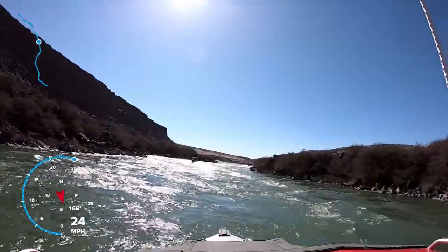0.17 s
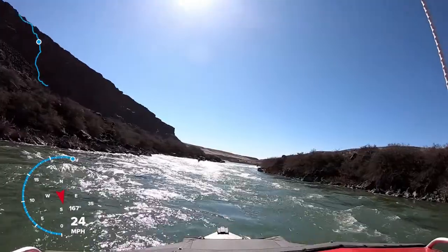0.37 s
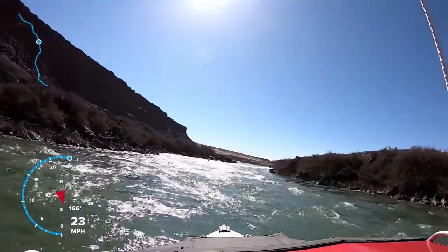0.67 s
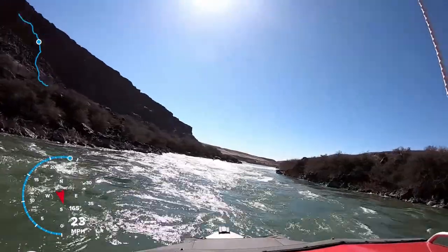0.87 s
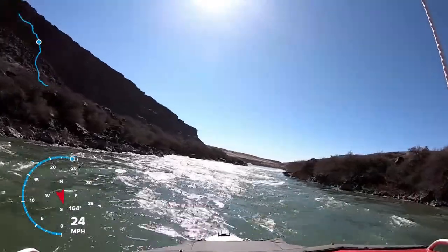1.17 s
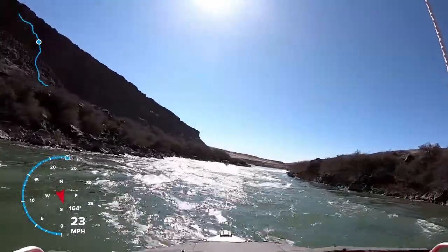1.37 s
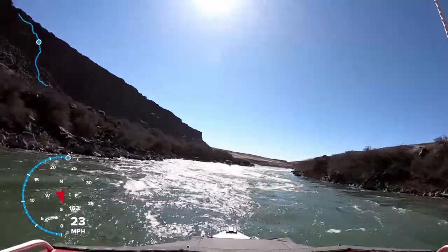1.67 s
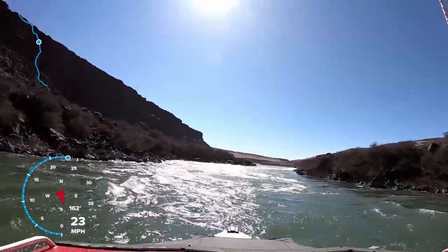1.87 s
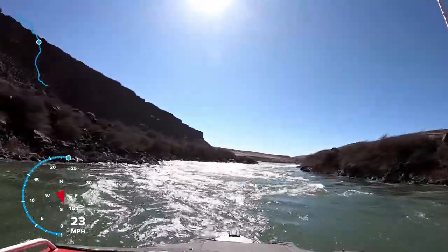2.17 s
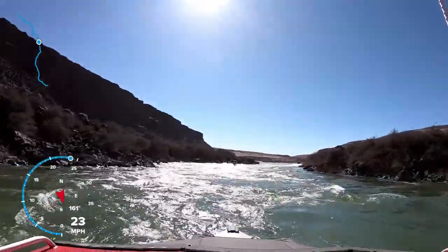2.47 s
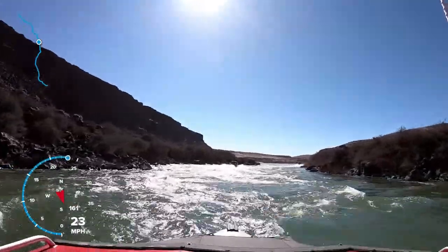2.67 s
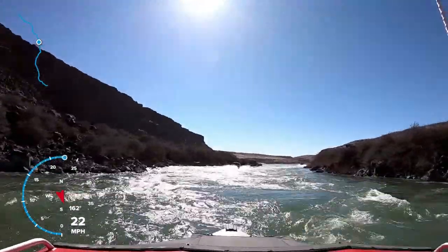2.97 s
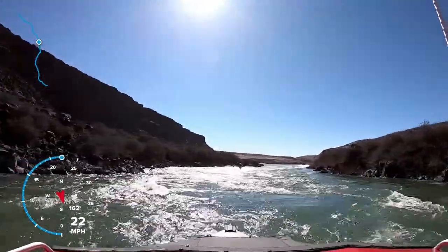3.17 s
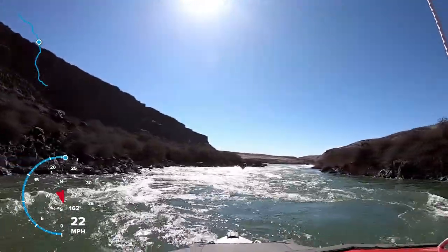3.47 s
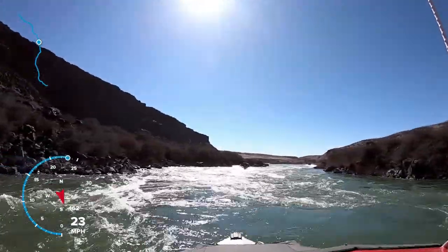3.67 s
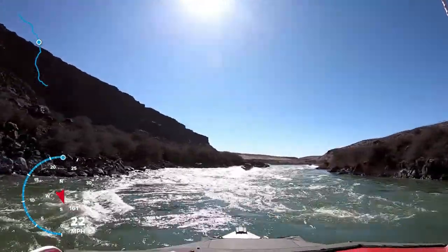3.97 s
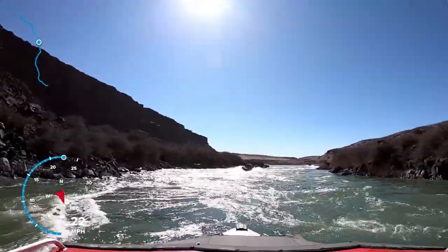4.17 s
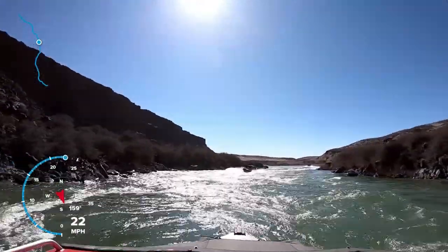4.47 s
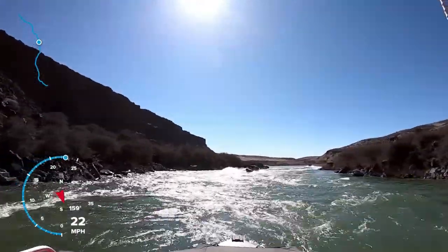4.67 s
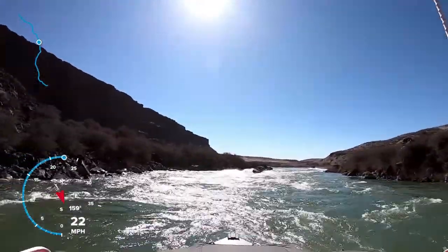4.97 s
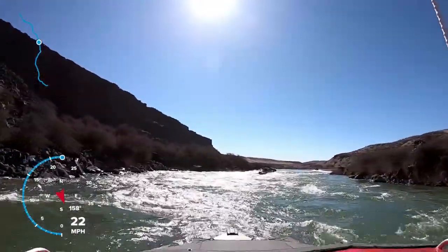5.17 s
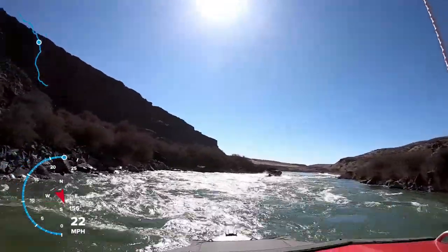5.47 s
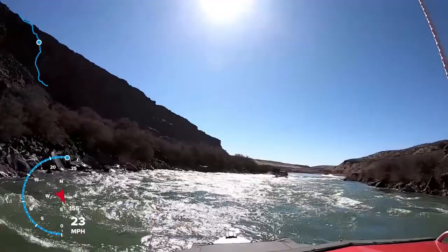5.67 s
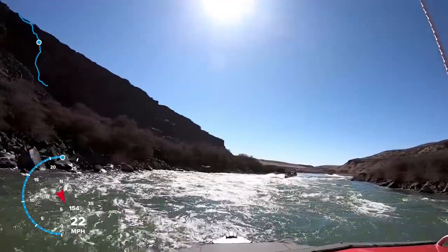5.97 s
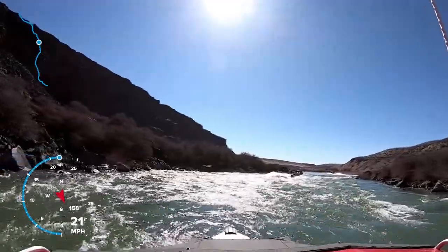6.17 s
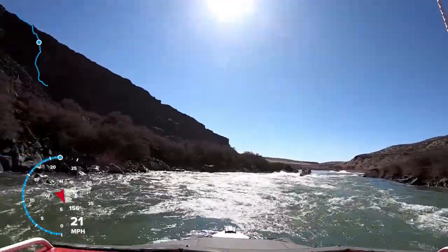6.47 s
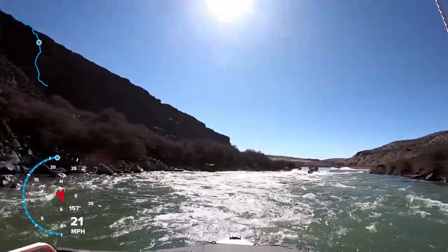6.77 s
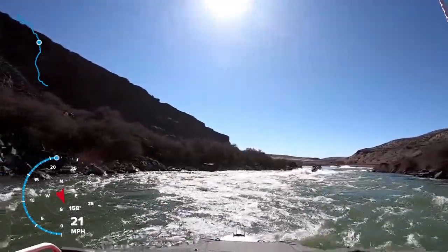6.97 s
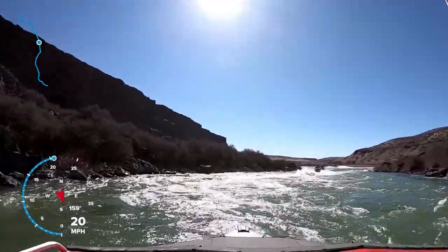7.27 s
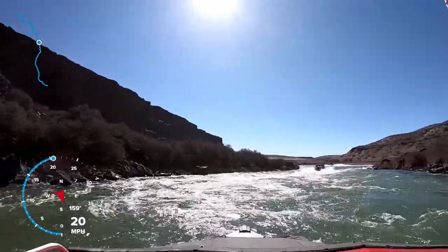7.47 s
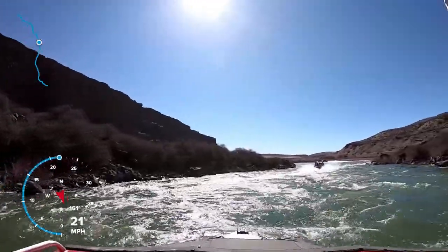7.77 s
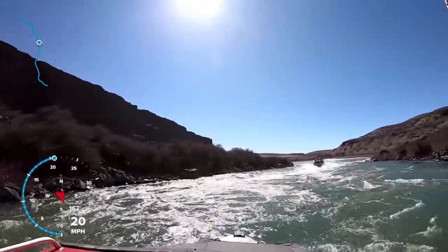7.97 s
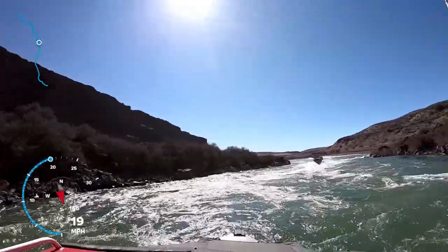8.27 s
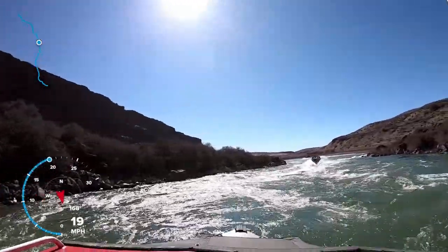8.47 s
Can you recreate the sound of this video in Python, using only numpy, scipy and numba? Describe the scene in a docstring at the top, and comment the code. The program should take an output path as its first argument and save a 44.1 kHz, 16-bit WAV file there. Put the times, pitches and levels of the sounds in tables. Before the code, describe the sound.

Wind rumbles, slaps and cracks against a deck microphone while a boat engine's smooth drone dips and rises over faint rushing river water.

```python
"""The firing tone of a jet boat's eight-cylinder engine slides and booms as the boat runs up a rapid.
Wind rumbles, slaps and cracks at the port of one deck microphone; white water and spray hiss behind.
Engine: sines at the firing rate and on its eighths, lifted by hull resonances. Wind and water: shaped
noise; cracks and jolts: short pressure pulses. A limiter holds the peaks; output is mono."""
import sys
import numpy as np
from scipy import signal
from scipy.fft import rfft, irfft, next_fast_len
from scipy.io import wavfile
from scipy.ndimage import uniform_filter1d
from numba import njit

SR = 44100
rng = np.random.default_rng(int(sys.argv[2]) if len(sys.argv) > 2 else 0)


def persist_wave(psi):
    """Save psi, clipped to +-1, as 16-bit WAV."""
    counts = np.round(np.clip(psi, -1, 1) * 32767).astype(np.int16)
    wavfile.write(sys.argv[1], SR, np.atleast_2d(counts).T)


N = 380141

# wind between the gusts: t/s, rumble level/dB, rasp level/dB
WIND_LEVELS = [(0, -26.5, -34.5), (.5, -27.5, -35.5), (1.1, -27.5, -34), (1.2, -33, -34), (1.42, -36, -35),
               (1.6, -33, -35), (1.8, -29, -37), (2.15, -29.5, -34.5), (2.45, -27.5, -35.5),
               (3.1, -28.5, -39), (3.6, -27, -39.5), (4.25, -26.5, -36), (4.6, -26, -35), (5.0, -26.5, -38),
               (5.3, -27, -37.5), (5.55, -32, -40), (6.2, -26.5, -35), (6.65, -26, -30.5),
               (6.95, -26, -36.5), (7.4, -28, -37.5), (7.56, -36, -38.5), (7.72, -45, -39.5),
               (7.95, -41, -41), (8.05, -35, -40.5), (8.2, -25.5, -40), (8.45, -31, -39), (8.62, -41, -35)]
# eddies at the port: t/s, nominal slap peak/dB, low gust rms/dB, edge against slap/dB
EDDIES = [(.04, -40, -32, -14), (.095, -27, -31, -4), (.185, -20.5, -23, -15), (0.231, -13, -19, -34),
          (.341, -12, -27, -36), (.734, -20, -23, -23), (.906, -18, -32, -18), (1.208, -25, -39, -25),
          (1.449, -39, -33, -12), (1.492, -20, -25.5, -13), (1.583, -25, -31, -18),
          (1.691, -16.5, -25, -35), (1.715, -13, -19.5, -29), (1.779, -16, -23, -29.5),
          (1.845, -19.5, -28, -17), (2.091, -27, -27, -24), (2.216, -13, -23, -15), (2.337, -33, -23, -21),
          (2.36, -14.5, -30, -16), (2.462, -36, -28, -26), (2.53, -32, -34, -25), (2.7, -22, -22, -20),
          (2.819, -20, -24.5, -22), (2.877, -20.5, -29, -16), (2.978, -15, -19, -16),
          (3.194, -11, -23, -19), (3.338, -20.5, -21, -11), (3.441, -11, -18.5, -20),
          (3.516, -19, -30, -13), (3.554, -12, -21, -24), (3.66, -42, -32, -18), (3.76, -16, -19.5, -12),
          (3.79, -18.5, -20.5, -23), (3.829, -19, -25, -32), (3.931, -23, -23.5, -18),
          (4.052, -17, -26, -26), (4.138, -23, -29, -29), (4.198, -18, -24, -25),
          (4.353, -15.5, -22.5, -17), (4.449, -11.5, -22.5, -20), (4.507, -14, -23, -17),
          (4.606, -11.5, -28, -31), (4.66, -34, -19.5, -23), (4.729, -15.5, -26, -28),
          (4.752, -16, -23, -24), (4.815, -24, -28, -14), (4.835, -11.5, -19, -14), (4.861, -25, -42, -33),
          (4.921, -17.5, -23.5, -36), (5.039, -14.5, -22, -16), (5.065, -19.5, -28, -28),
          (5.29, -25, -26, -16), (5.315, -22, -22.5, -16), (5.349, -26, -28, -28), (5.372, -15, -30, -19),
          (5.391, -18, -29, -18), (5.414, -20.5, -22, -31), (5.632, -36, -23.5, -11),
          (5.682, -16.5, -25, -15), (5.779, -19, -25.5, -25), (5.883, -14.5, -23.5, -17),
          (5.934, -20, -22, -12), (5.966, -22, -36, -18), (6.195, -14.5, -24, -22), (6.467, -24, -31, -20),
          (6.615, -34, -29, -20), (6.652, -33, -29, -29), (6.7, -18, -23.5, -24), (6.78, -31, -22, -22),
          (6.95, -24, -23, -10), (6.972, -14, -22, -23), (7.069, -26, -26.5, -19), (7.203, -23, -23, -21),
          (8.047, -37, -24.5, 3), (8.117, -19, -27, -12), (8.565, -25, -31.5, -22), (8.59, -21, -20.5, -25)]
SLAP_S = 0.011  # mean half length


def undb(db):
    """Decibels to gain."""
    return 10 ** (np.asarray(db) / 20)


def curves(table):
    """Columns after time, interpolated to one value per sample."""
    t_s, *columns = np.transpose(table)
    return [np.interp(np.arange(N) / SR, t_s, c) for c in columns]


def walk(rate_hz):
    """Random levels held 1 / rate_hz and slewed by two moving averages; standard deviation 1."""
    hold = int(SR / rate_hz)
    steps = np.repeat(rng.standard_normal(N // hold + 1), hold)
    slewed = uniform_filter1d(uniform_filter1d(steps, hold), hold)[:N]
    return slewed / slewed.std()


def noise(points, shared_db, own_db, rate_hz):
    """Coloured noise, rms 1, in overlapping 2/3-octave bands; levels flicker together and alone."""
    size = next_fast_len(N)
    bin_place = np.log2(np.arange(size // 2 + 1) * SR / size + 1e-9) * 3 / 2  # in 2/3 octaves
    f_hz, level_db = np.transpose(points)
    place = np.log2(f_hz) * 3 / 2
    colour = undb(np.interp(bin_place, place, level_db, -200, -200))
    spectrum = rfft(rng.standard_normal(size)) * colour
    out, shared = 0, shared_db * walk(rate_hz)
    for centre in range(int(place[0]), int(place[-1]) + 2):
        window = np.clip(1 - abs(bin_place - centre), 0, 1)
        out = out + irfft(spectrum * window, size)[:N] * undb(shared + own_db * walk(rate_hz))
    return out / out.std()


def band(lo_hz, hi_hz, order=2):
    """Noise of rms 1 between two edges."""
    sos = signal.butter(order, [lo_hz, hi_hz], "band", fs=SR, output="sos")
    x = signal.sosfilt(sos, rng.standard_normal(N))
    return x / x.std()


def puffs(times_s, peaks, lengths_s):
    """Sum of Gaussian swells."""
    out = np.zeros(N)
    for t_s, peak, length_s in zip(times_s, peaks, lengths_s):
        first = max(int((t_s - 3 * length_s) * SR), 0)
        last = min(int((t_s + 3 * length_s) * SR), N)
        i = np.arange(first, last)
        out[i] += peak * np.exp(-((i / SR - t_s) / length_s) ** 2)
    return out


def steady(x, span_s):
    """Evens out the level over this span and keeps the finer grain."""
    return x / np.sqrt(uniform_filter1d(x ** 2, int(span_s * SR)) + 1e-3)


def river():
    """White water round the hull, fine spray above it and ticking drops: noise in three colours."""
    # t/s, white water level/dB, spray level/dB
    river_levels = [(0.0, -49, -63), (0.02, -48, -61.5), (0.12, -46.5, -61), (0.89, -48, -62),
                    (1.06, -49, -66.5), (1.4, -49.5, -62.5), (1.9, -48.5, -61.5), (2.88, -46.5, -58),
                    (3.07, -48.5, -59.5), (3.53, -49, -60), (3.6, -50, -64.5), (4.34, -47, -58),
                    (4.49, -47, -60), (5.54, -49.5, -61.5), (6.74, -47, -60), (7.46, -49.5, -58.5),
                    (7.7, -50, -61), (7.92, -51, -63), (8.2, -49, -62.5), (8.62, -45.5, -59.5)]
    # noise spectra: f/Hz, relative density level/dB
    water_spectrum = [(350, -33), (600, -9), (785, -15.5), (868, -7), (1180, -7.5), (1370, -4), (1610, -9),
                      (3540, -12.5), (6500, -30), (8450, -57), (14300, -120)]
    spray_spectrum = [(3500, -19.5), (4500, -5), (5200, -4.5), (6350, -8.5), (8150, -8.5), (9600, -14.5),
                      (10300, -21.5), (11000, -29), (12500, -32), (15500, -40.5), (17000, -52.5)]
    # drops on the housing: t/s, envelope peak/dB
    drops = [(8.176, -63)]

    water_db, spray_db = curves(river_levels)
    water = noise(water_spectrum, shared_db=-0.64, own_db=0.0, rate_hz=12)
    spray = noise(spray_spectrum, shared_db=-0.5, own_db=1.24, rate_hz=13)
    t_s, drop_db = np.transpose(drops)
    ticks = puffs(t_s + .002, undb(drop_db), .002 + 0 * t_s) * band(3000, 9000, order=6)
    return undb(water_db) * water + undb(spray_db) * spray + ticks


def wind():
    """Turbulence on the port: a deep rumble and a rasp that swell with every gust."""
    # noise spectra: f/Hz, relative density level/dB
    rumble_spectrum = [(15, -32.5), (25, 0), (40, 0), (65, 4), (90, -2.5), (130, 0.5), (180, -4.5),
                       (250, -18.5), (400, -31)]
    rasp_spectrum = [(100, -21), (170, -3.5), (260, 0.5), (400, -4.5), (630, -10), (1000, -17), (1600, -26),
                     (3000, -37)]
    # brief changes of the wind between gusts: t/s, change/dB
    brief_changes = [(.47, -1), (.83, -6), (1.37, -0.5), (1.83, -5), (2.4, -8), (2.44, -6), (2.6, 0),
                     (2.92, 0), (3.28, 6), (3.62, -1.5), (3.99, -3), (4.25, -3), (5.12, -4.5), (5.48, 1),
                     (6.0, -3.5), (6.25, -6), (6.82, -0.5), (7.02, -4.5)]
    change_s = .028  # half length
    gust_s, gust_late_s = 0.026, 0.0057  # half length; delay of gust peak after the tabled time
    gust_rasp_db = -21.5  # rasp rms against nominal slap peak

    rumble_db, rasp_db = curves(WIND_LEVELS)
    t_s, slap_db, gust_db, _ = np.transpose(EDDIES)
    gust_t_s, gust_lengths_s = t_s + gust_late_s, gust_s + 0 * t_s
    low_gust = puffs(gust_t_s, undb(gust_db), gust_lengths_s)
    high_gust = puffs(gust_t_s, undb(slap_db + gust_rasp_db), gust_lengths_s)
    rumble = steady(noise(rumble_spectrum, shared_db=1.1, own_db=1.5, rate_hz=14), .09)
    rasp = noise(rasp_spectrum, shared_db=1.0, own_db=1.5, rate_hz=35)
    t_s, depth_db = np.transpose(brief_changes)
    change_db = puffs(t_s, depth_db, change_s + 0 * t_s)
    rumble_gain = np.hypot(undb(rumble_db + change_db), low_gust)
    rasp_gain = np.hypot(undb(rasp_db + change_db), high_gust)
    return rumble_gain * rumble + rasp_gain * rasp


def slaps():
    """Each eddy is a ragged swell of noise with a tail, over a longer bass thump without one."""
    crest_db = 16.5  # peak of a short noise burst over its rms
    thump_db = -4.5  # against the low gust
    length_spread = .12  # log standard deviation
    ragged_db, ragged_hz = 3, 200
    tail_lengths, tail_db = 2.6, -10.5  # tail length in slaps; level against the slap
    splash_db = -12  # upper mids against the body

    t_s, slap_db, gust_db, edge_db = np.transpose(EDDIES)
    chance = rng.standard_normal((len(t_s), 2)).T
    length_s = SLAP_S * np.exp(length_spread * chance[0])
    t_s, slap_db = t_s + 0.54 * SLAP_S, slap_db - crest_db
    tail_s = tail_lengths * length_s

    def swell(db, share, hiss):
        grains = steady(hiss * undb(ragged_db * walk(ragged_hz)), .02)
        hit = puffs(t_s, undb(db), share * length_s)
        tail = puffs(t_s + tail_s / 2, undb(db + tail_db + 2 * chance[1]), tail_s)
        return (hit + tail) * grains

    body = swell(slap_db, 1., band(280, 547))
    thump = puffs(t_s, undb(gust_db + thump_db), 1.59 * length_s) * steady(band(90, 285), 0.048)
    edge = swell(slap_db + edge_db, .8, band(730, 3100))
    splash = swell(slap_db + splash_db, 0.75, band(560, 1300))
    muffle = signal.butter(4, 4000, fs=SR, output="sos")
    return signal.sosfilt(muffle, body + thump + edge + splash)


def cracks():
    """Port pressure jumps either way within a fraction of a millisecond and swings back, damped."""
    # t/s, pulse peak/dB
    crack_peaks = [(.346, -26), (.739, -28), (1.032, -28), (1.713, -23), (1.777, -26), (2.09, -35),
                   (2.218, -24), (2.367, -24), (3.196, -20.5), (3.339, -27), (3.439, -22.5), (3.452, -23),
                   (3.761, -24), (3.787, -26), (3.807, -25), (4.053, -22.5), (4.197, -31), (4.449, -27),
                   (4.728, -26), (4.825, -23), (4.832, -20), (4.843, -14.5), (4.858, -26), (4.919, -24),
                   (5.041, -32), (5.348, -29), (5.371, -26), (5.688, -30), (5.694, -19), (5.883, -31),
                   (5.935, -23.5), (6.205, -23), (6.476, -26), (6.752, -26), (6.977, -26), (6.984, -16),
                   (7.195, -40), (8.117, -30)]
    t_s, peak_db = np.transpose(crack_peaks)
    blows = np.zeros(N)
    blows[((t_s + .0015) * SR).astype(int)] = undb(peak_db) * rng.choice([-1, 1], len(t_s))
    age_s = np.arange(SR // 20) / SR
    jump = np.exp(-age_s / 0.0009) * np.cos(2 * np.pi * 700 * age_s)
    jump = signal.sosfilt(signal.butter(3, 1900, fs=SR, output="sos"), jump)
    return signal.fftconvolve(blows, jump / abs(jump).max())[:N]


def jolts():
    """N-shaped swings: pressure winds up one way, snaps across and sags back, in either polarity."""
    # t/s, peak-to-peak snap/dB
    snaps = [(0.231, -12), (0.239, -6.5), (0.253, -10), (0.354, -17), (0.746, -12), (1.5, -15),
             (1.585, -15), (1.701, -10), (1.714, -24), (1.782, -4.5), (2.095, -9), (2.353, -12),
             (2.361, -9), (3.198, -10), (3.453, -12), (3.556, -11), (3.791, -16), (3.834, -18),
             (4.215, -13), (4.451, -15), (4.608, -14), (4.616, -7.5), (4.754, -8), (4.827, -9), (4.831, -9),
             (4.845, -17), (4.863, -14), (4.918, -13), (4.935, -13), (5.324, -18), (5.352, -11),
             (5.368, -18), (5.405, -18), (5.426, -12), (6.956, -18), (6.973, -15), (6.979, -14),
             (6.985, -12), (8.037, -20), (8.12, -13), (8.17, -17), (8.293, -15), (8.36, -15), (8.4, -15),
             (8.43, -14.5), (8.6, -10)]
    wind_up_s, snap_s = 0.0015, 0.0006  # time constants: wind-up and sag; snap
    t_s, size_db = np.transpose(snaps)
    blows = np.zeros(N)
    blows[(t_s * SR).astype(int)] = undb(size_db) * rng.choice([-1, 1], len(t_s))
    lag_s = np.arange(-SR // 50, SR // 50 + 1) / SR
    swing = np.tanh(lag_s / snap_s) * np.exp(-abs(lag_s) / wind_up_s)
    return signal.fftconvolve(blows, swing / np.ptp(swing), "same")


def engine():
    """A nearly pure firing tone, and weaker wavering lines on eighths of it, lifted by the hull."""
    # t/s, firing rate f/Hz, firing tone swell/dB, uneven lines gain/dB
    revs = [(0, 243, -7, 2.5), (.35, 242.7, 4.5, 1), (.74, 240.4, -4, 3.5), (.82, 229.6, 6, 1),
            (.9, 217.6, 6.5, 1), (.97, 209, 4.5, -1.5), (1.05, 201.4, 2, -1), (1.2, 195.3, 4, -3),
            (1.35, 190.6, 5.5, 3), (1.45, 190.8, -1.5, 5), (1.53, 202.4, 1, 2), (1.65, 209.4, 4, 4),
            (1.8, 214.8, -9, -2.5), (1.95, 212.9, 3, 0.5), (2.4, 214.8, -5.5, -3), (2.7, 216.6, 0, 0),
            (3.15, 216.4, 0, 0.5), (3.6, 203.5, -9, -3.5), (3.85, 202.7, 2.5, 1), (4.07, 200.9, -8, -4),
            (4.35, 224.9, -19, -6), (4.55, 234.5, -2, -2.5), (4.97, 245.3, -7.5, -5), (5.25, 220.8, 6, -1),
            (5.4, 205.3, -8, -2), (5.47, 196.2, -1.5, -6), (5.55, 194.7, 0.5, -5), (5.65, 194.2, 1, -11),
            (5.72, 194.5, -9, 0), (5.9, 206.7, -9.5, -2.5), (6.45, 225, 0.5, 1), (6.6, 219.4, 1, 1),
            (6.83, 204.3, -2, -1), (6.88, 200.7, 4, -4), (6.94, 198, -3.5, -6), (7.05, 194.9, -1, -11),
            (7.15, 194.5, 1.5, -3.5), (7.23, 191.5, 1, -11), (7.36, 191.6, 2, -8), (7.49, 189, 1.5, -8.5),
            (7.56, 187.3, 4.5, -7.5), (7.75, 179.7, 1, -7.5), (7.83, 171.7, -2, -9.5), (7.89, 164, 0, -1.5),
            (7.97, 174.3, -4.5, 2), (8.03, 186.2, 3.5, -1), (8.12, 198, 6, -2), (8.14, 203.8, -11, -0.5),
            (8.25, 223.2, -2, 0), (8.4, 235.8, 5, -0.5), (8.62, 239, -1, 2.5)]
    # multiple of firing rate, level against firing tone/dB
    overtones = [(2, -34)]
    # uneven cylinders and pump shaft: eighths of firing rate, level/dB
    uneven_lines = [(2, -44.5), (4, -37.5), (5, -41.5), (6, -42.5), (7, -43.5), (9, -44), (10, -42.5),
                    (11, -47.5), (12, -46.5), (13, -47.5), (14, -57), (15, -61), (16, -54.5), (17, -61),
                    (18, -59.5), (20, -58), (21, -62), (24, -59.5), (26, -64.5), (28, -60)]
    # hull resonances on the uneven lines: f/Hz, half width/Hz, lift/dB, added lift in falling revs/dB
    hull_modes = [(157.5, 20.3, 7.5, 2.5), (665, 30, 7, 5)]
    # brief level changes of the firing tone: t/s, change/dB
    tone_changes = [(7.005, -12), (8.062, -32), (8.18, 1)]
    change_s = 0.017  # half length
    tone_db = -42  # far from the boom
    boom_hz, boom_width_hz, boom_db = 170.6, 27.2, 26.5  # hull resonance on the firing tone
    overrun_hz_per_s = 90  # fall of the firing rate that gives the full added lift
    calm_db, buffet_waver = -40, .05  # rumble above calm makes the tone waver more, dB per dB

    hz, swell_db, uneven_db = curves(revs)
    t_s, depth_db = np.transpose(tone_changes)
    boom_lift_db = boom_db / (1 + ((hz - boom_hz) / boom_width_hz) ** 2)
    level_db = swell_db + tone_db + boom_lift_db + puffs(t_s, depth_db, change_s + 0 * t_s)
    phase = 2 * np.pi * np.cumsum(hz * (1 + 0.0031 * walk(30))) / SR
    tone = np.sin(phase)
    for multiple, db in overtones:
        tone = tone + undb(db + 3.0 * walk(15)) * np.sin(multiple * phase)

    fall_hz_per_s = -np.gradient(uniform_filter1d(hz, SR // 20)) * SR
    overrun = np.clip(fall_hz_per_s / overrun_hz_per_s, 0, 1)
    lumps = 0
    for eighths, db in uneven_lines:
        ratio = round(eighths) / 8
        lift_db = sum((peak_db + fall_db * overrun) / (1 + ((ratio * hz - mode_hz) / width_hz) ** 2)
                      for mode_hz, width_hz, peak_db, fall_db in hull_modes)
        gain = undb(db + lift_db + 3.0 * walk(14))
        line_phase = ratio * (phase + 0.46 * walk(18)) + rng.uniform(0, 2 * np.pi)
        lumps = lumps + gain * np.sin(line_phase)

    buffet_db = np.clip(curves(WIND_LEVELS)[0] - calm_db, 0, 12)
    waver_db = (.8 + buffet_waver * buffet_db) * walk(32)
    return np.sqrt(2) * (undb(level_db + waver_db) * tone + undb(uneven_db) * lumps)


def scene():
    """Everything at one microphone; wind and slap pressure flattens at the port."""
    port_top = undb(-13.5)
    port = port_top * np.tanh((wind() + slaps()) / port_top)
    return (engine() + port + cracks() + jolts() + river())[None]


@njit
def limiter(x, top, ratio, attack, release, ahead):
    """Follows the level a few samples ahead and turns the gain down when it exceeds the top."""
    y, level = np.empty(len(x)), 0.
    for i in range(len(x)):
        coming = abs(x[min(i + ahead, len(x) - 1)])
        level += (coming - level) * (attack if coming > level else release)
        y[i] = x[i] * (min(1., top / (level + 1e-9)) ** (1 - 1 / ratio))
    return y


def record(dry):
    """A quick limiter holds the gusts down, and an elliptic low-pass cuts the top."""
    attack_s, release_s, top_hz = .0004, .03, 15700
    held = limiter(dry[0], .235, 5.0, 1 / (attack_s * SR), 1 / (release_s * SR), SR // 2000)[None]
    return signal.sosfilt(signal.ellip(8, .2, 70, top_hz, fs=SR, output="sos"), held)


dry = scene()
out = record(dry)
persist_wave(out)
```